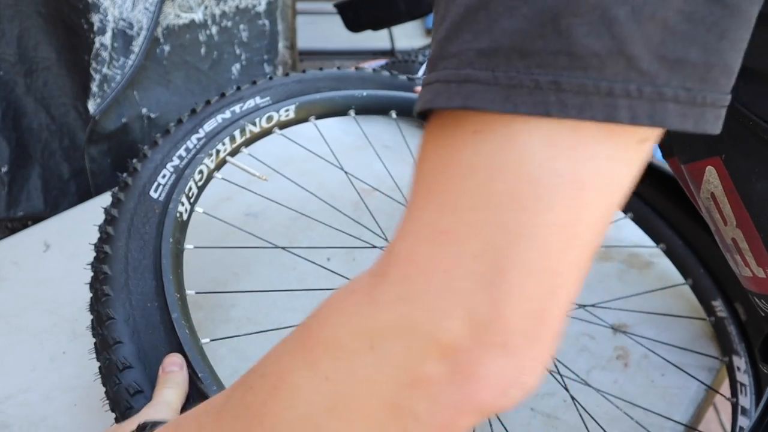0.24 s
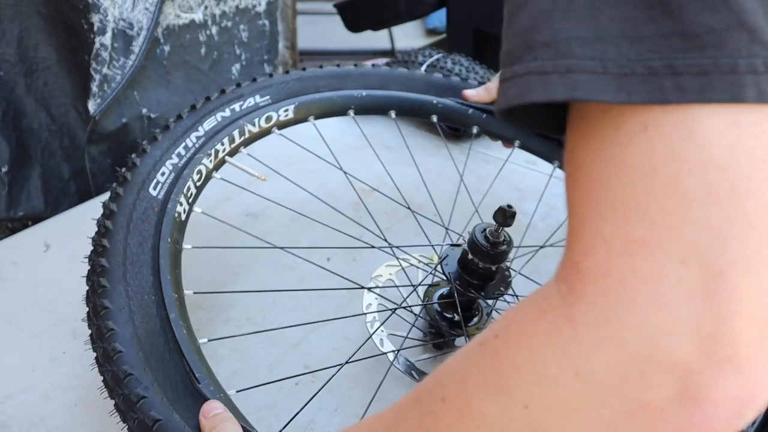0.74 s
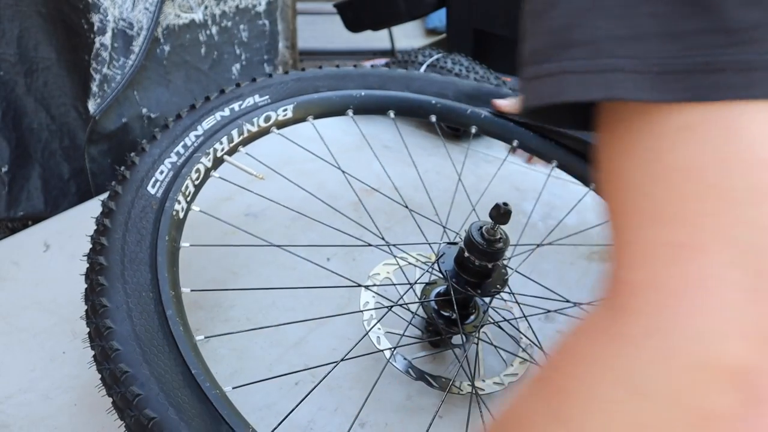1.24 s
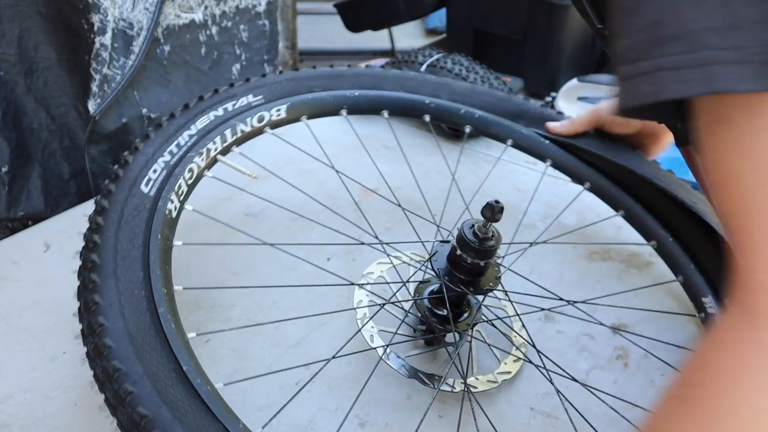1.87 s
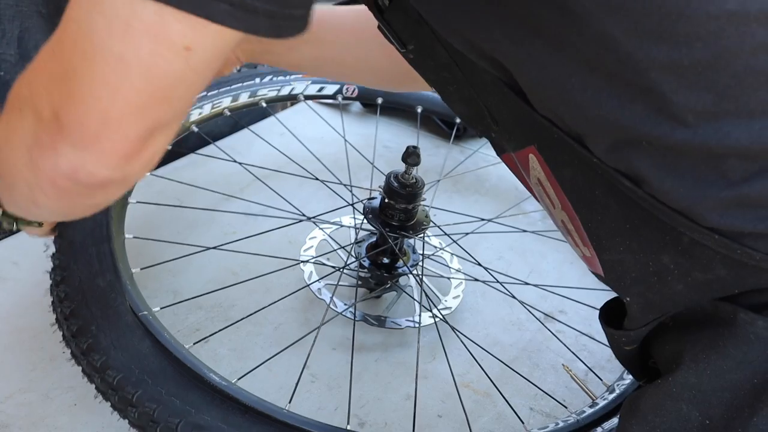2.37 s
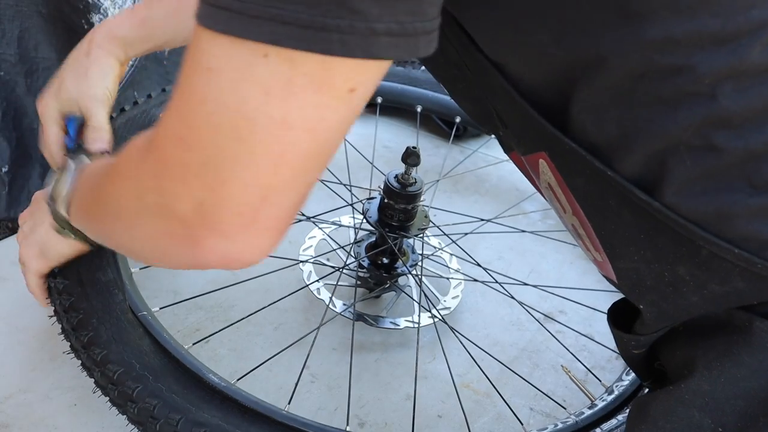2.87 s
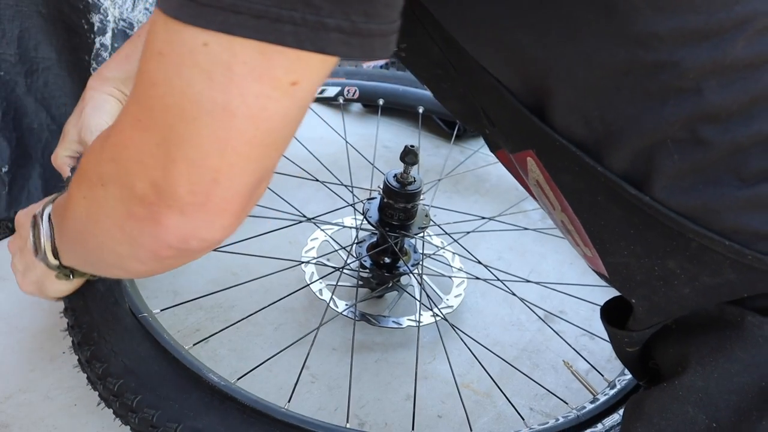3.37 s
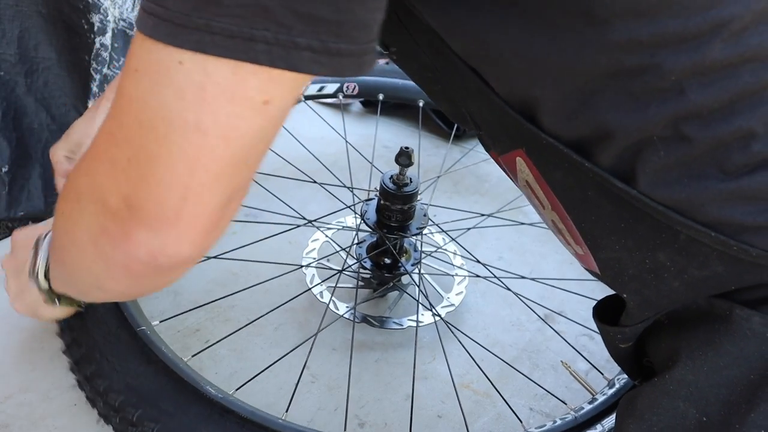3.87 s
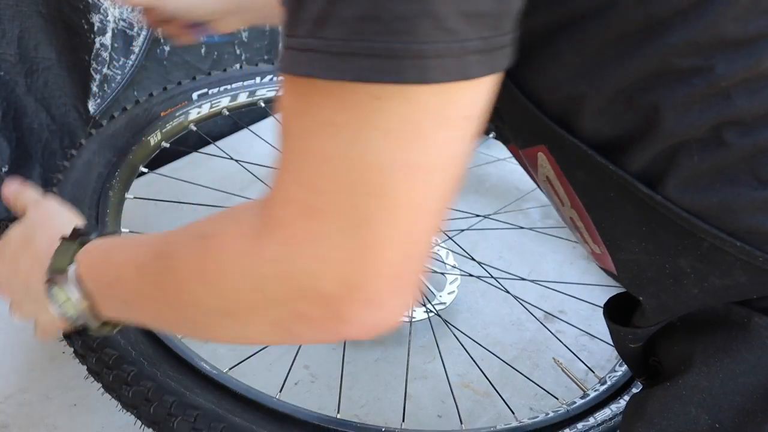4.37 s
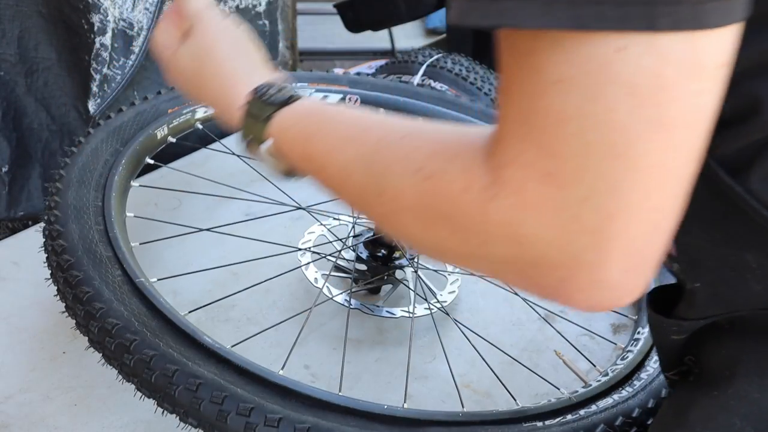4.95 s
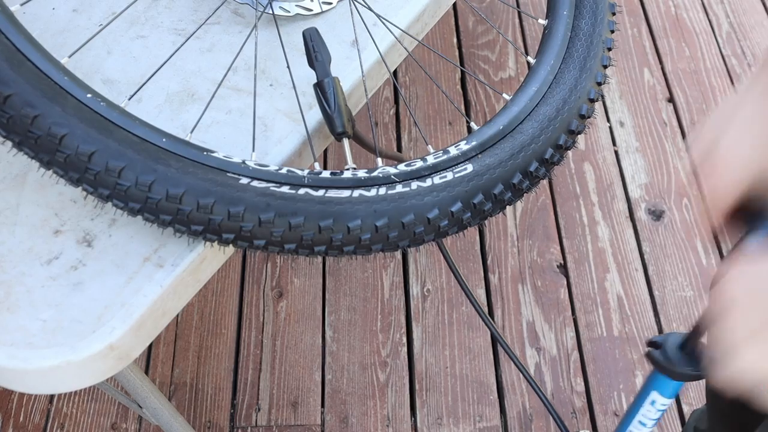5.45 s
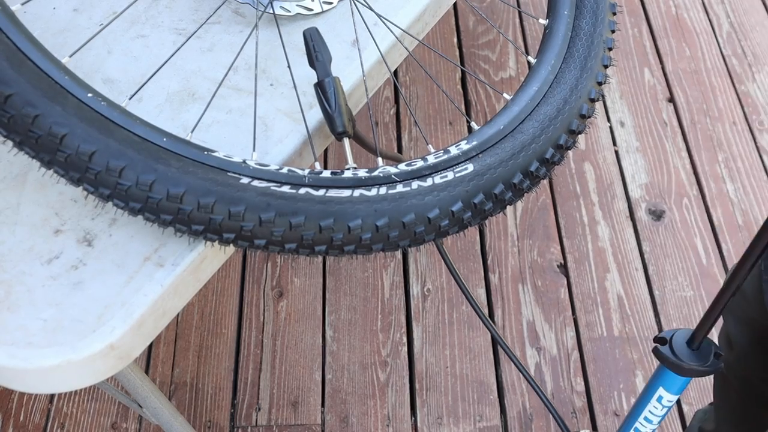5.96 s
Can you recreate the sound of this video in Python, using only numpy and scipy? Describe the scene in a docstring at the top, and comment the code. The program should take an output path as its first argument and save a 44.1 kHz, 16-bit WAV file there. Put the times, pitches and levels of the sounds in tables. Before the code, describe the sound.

Outdoors, a bicycle tyre is worked onto its rim with rubbing, table thumps and sharp rubber snaps, then a hand pump hisses and knocks.

```python
"""On a wooden deck outdoors, a bicycle wheel lies on a plastic table while a tyre is worked onto its rim.
Ringing modes and dense clatter make the thumps on the table top and the snaps of the bead, the tyre's edge.
Shaped noise makes the palms sliding over rubber, the rustling and the ticks; gliding tones make a small bird.
Then a floor pump hisses through one stroke, knocks at the bottom, is drawn up and starts the next.
Behind it all lie steady outdoor noise and a far hum."""
import sys
import numpy as np
from scipy import signal
from scipy.fft import rfft, irfft, next_fast_len
from scipy.io import wavfile
from scipy.ndimage import uniform_filter1d, minimum_filter1d

SR = 44100
rng = np.random.default_rng(int(sys.argv[2]) if len(sys.argv) > 2 else 0)


def generate_wav(sig):
    """Save sig (samples, or channels by samples) to the path in sys.argv[1] as 16-bit PCM at SR."""
    pcm = np.round(np.clip(np.atleast_2d(sig).T, -1, 1) * 32767).astype(np.int16)
    wavfile.write(sys.argv[1], SR, pcm)


N = 274302
TIME = np.arange(N) / SR
AGE = np.arange(int(.45 * SR)) / SR   # seconds since the start of one short sound

# In all tables t60_s is the time a ringing sound takes to fall by 60 dB.
# Outdoor background: pitch_hz, level_db (per Hz)
BACKGROUND = [(15, -61), (25, -29), (43, -13.5), (84, -9), (120, -6.5), (141, -7.5), (285, -9.5),
              (317, -13), (354, -11), (545, -16.5), (734, -18), (2160, -29), (8830, -39), (16000, -43)]
BACKGROUND_DB = -58
HUM_HZ, HUM_DB = 120, -66.5
# Scatter from house wall and furniture: pitch_hz, level_db (per Hz), t60_s
YARD = [(146, 1.5, 0.28), (599.7, 3, 0.17), (2630, -0.5, .15), (6000, 0.5, 0.056), (15300, 0.5, 0.16)]
# Bird notes: start_s, length_s, start_hz, end_hz, level_db
CHIRPS = [(0.053, 0.043, 7130, 7030, -42), (0.578, 0.045, 7230, 6870, -35.5),
          (1.077, 0.05, 7200, 7150, -73), (2.949, 0.07, 6900, 7170, -62)]

# Rustling of clothes and fingers, and at 1.615 s the noisy tail of the first snap:
# peak_s, rise_s, fall_s, level_db, swish_db (bright part, relative to the rustle)
RUSTLE = [(0.03, 0.26, 0.58, -50, -15), (1.0, 0.22, 0.39, -59, -32), (1.615, 0.097, 0.14, -47, -26),
          (2.24, 0.47, 0.35, -59.5, -27), (2.45, 0.18, 0.16, -59, -3.5), (2.9, 0.31, 0.37, -61.5, -25),
          (3.59, 0.054, 0.044, -56, -11), (3.92, 0.32, 0.49, -56.5, -30.5), (5.98, 0.65, 1, -53, -32)]
# Colour of the dull rustle: pitch_hz, level_db (per Hz)
RUSTLE_COLOUR = [(400, 12.5), (2500, -2), (5000, -10), (9000, -11.5), (16000, -24)]
RUSTLE_REST_DB = -67.5   # between the swells
# A palm slides along the tyre: start_s, length_s, level_db, firmness (of the grip, 0 to 1)
SLIDES = [(0.532, 0.31, -49.5, 0.25), (1.206, 0.28, -40.5, 0.09), (1.836, 0.28, -39.5, 0.82)]
# Colour of the rubbing under a light and under a firm grip: pitch_hz, level_db (per Hz)
LIGHT_GRIP = [(350, -46), (600, 12), (698, -4.5), (801, 17.5), (881, 8), (970, 10.5), (1530, 3.5),
              (2540, 0.5), (3530, -10), (5190, 2), (7020, 0.5), (8740, 5), (14900, -27), (16000, -30)]
FIRM_GRIP = [(290, -46), (500, -3.5), (740, 6.5), (1440, 0.5), (1980, 7), (2160, 6), (2430, 6), (3340, 5),
             (4030, 6), (5020, 0), (8580, -4), (16000, -32)]
SLIDE_POWER = 1.7   # the speed is half a sine; the hiss grows as this power of it
# Rubber shuddering as it is pushed over the rim
SHUDDER_S, SHUDDER_LENGTH_S, SHUDDER_HZ, SHUDDER_DB = 2.888, .095, 87.7, -43
# A finger squeaking on the tyre
SQUEAK_S, SQUEAK_LENGTH_S, SQUEAK_HZ, SQUEAK_DB = 4.252, .058, 977, -54.5

# The clearest ticks and scuffs of rubber, rim and pump fittings: start_s, level_db, pitch_hz, t60_s
TICKS = [(0.997, -46.5, 2600, 0.1), (1.019, -44, 5100, 0.0087), (1.2053, -49.5, 5470, 0.02),
         (1.712, -54, 4000, 0.027), (2.2837, -49, 4330, 0.19), (2.374, -54, 3260, 0.097),
         (2.447, -48.5, 2300, 0.16), (3.1627, -50, 3540, 0.02), (3.2842, -49.5, 1793, 0.028),
         (3.702, -49.5, 840, .1), (3.8986, -39, 2000, 0.092), (3.97, -51, 1990, 0.17),
         (4.191, -48.5, 2160, 0.11), (5.403, -37, 2240, 0.081), (5.7022, -34, 2800, 0.033),
         (5.848, -39, 1390, 0.073), (5.877, -46, 2630, 0.26), (6.028, -47, 1200, 0.26)]
# Fainter ticks come at random; their level is relative to the rustle around them
STRAY_WAIT_S = 1 / 6.8   # median wait from one to the next
STRAY_DB, STRAY_SPREAD_DB = 3.5, 1.5
STRAY_HZ, STRAY_SPREAD_OCTAVES, STRAY_T60_S = 3200, 0.5, 0.043

# The pump handle is pushed down: start_s, open_s (time for the valve to open), level_db
STROKES = [(5.437, 0.0088, -47.5), (6.146, 0.03, -46)]
STROKE_S = .272
# The hiss swells as the weight comes on the handle
PUSH_DB, PUSH_PEAK_S, PUSH_RISE_S, PUSH_FALL_S = 5, .21, 0.17, 0.18
SHUT_DB, BLEED_T60_S = -6.5, 0.29   # at the bottom the flow drops and the hose bleeds out
# The handle is drawn up and sucks air in
INTAKE_S, INTAKE_RISE_S, INTAKE_FALL_S, INTAKE_DB = 6.03, 0.15, 0.069, -50.5
# Colour of the pump's hiss: pitch_hz, level_db (per Hz)
AIR_COLOUR = [(200, 5.5), (650, 7.5), (1100, 2), (2300, -6), (3300, -1), (5500, 5), (6700, 3), (8500, 8),
              (10300, -1), (14000, -2.5), (16000, -6)]
# Piston meeting the ends of its travel: start_s, level_db, cutoff_hz
PISTON = [(5.7034, -16, 925), (5.708, 2.5, 840), (6.025, -27, 617)]
# Modes (ringing notes) of the pump barrel: pitch_hz, level_db, t60_s
PUMP_MODES = [(233, -28, 0.25), (345, -19.5, 0.043), (453, -3.5, 0.017), (578, 1, 0.015), (661, -0.5, 0.02),
              (860, -9.5, 0.03), (1270, -6.5, 0.022)]
# Boards shaken by the pump's foot: pitch_hz, level_db (per Hz), t60_s
DECK_CLATTER = [(50, -17, 0.84), (196, -4, 0.36), (403, 3, 0.11), (680, 0, 0.11), (1040, -7, 0.094),
                (1820, 5, 0.085), (4000, -47, .1)]
# The deck sagging under the stroke and springing back: start_s, level_db, pitch_hz, t60_s
DECK_BOOM = [(5.725, -20, 30.2, 0.35), (5.742, -35.5, 58.7, 0.32), (5.874, -32, 48.5, 0.29)]

# Rim knocked lightly: start_s, level_db
KNOCKS = [(0.3143, -29.5), (0.3185, -40), (2.287, -44.5), (2.3045, -34.5), (2.311, -46), (2.325, -47),
          (2.461, -47), (3.8986, -32.5), (3.905, -45)]
# The rim with the tyre on it: pitch_hz, level_db, t60_s
RIM_MODES = [(426.7, -7.5, 0.13), (710, 11, 0.023), (876, -0.5, 0.089), (1374, -8.5, 0.05),
             (2210, 6.5, 0.017), (2410, -17, 0.065), (3750, -19, 0.017)]
# The dense shiver of rim and spokes: pitch_hz, level_db (per Hz), t60_s
SHIVER = [(200, -9.5, 0.069), (452, 1.5, 0.13), (750, -1, 0.12), (1410, 5.5, 0.099), (3500, 4.5, 0.07),
          (5940, -2, 0.13), (9010, -17, 0.099), (14970, -14.5, .06)]
# Wheel dropping on the table: start_s, level_db, low_modes_db (extra weight in the bass), contact_cutoff_hz
THUMPS = [(0.032, -29.5, -7.5, 3830), (0.061, -37.5, 2.5, 666), (0.1453, -24, 3, 2570),
          (0.5786, -29.5, -9, 1910), (0.603, -32, 2.5, 696), (0.6756, -24, 2.5, 2000),
          (0.9466, -42.5, -25, 4160), (1.156, -52, 0.5, 1800), (1.2243, -18.5, -2, 2400),
          (1.7884, -16.5, -3.5, 2750), (1.8411, -21.5, -3.5, 2160)]
# Wheel and table top together: pitch_hz, level_db, t60_s (before the hands choke it)
TABLE_MODES = [(61.8, 0.5, 0.19), (92, -6, 0.59), (157.5, -8, 0.53), (208.8, 2.5, 0.18), (303, -21, 0.099),
               (375, -12, 0.08), (429.3, -1, 0.097), (457, -14.5, 0.51), (543.6, -3, 0.071),
               (783, -9.5, 0.083), (966, -3, 0.057), (1110, -48, 0.43), (1480, -32, 0.022),
               (2123, -11.5, 0.051)]
# Their crowd of weaker modes: pitch_hz, level_db (per Hz), t60_s
TABLE_CLATTER = [(100, 6, 0.051), (406, 1.5, 0.25), (594, -8.5, 0.17), (990, -3, 0.12), (1860, -5.5, 0.083),
                 (3040, -21.5, 0.12), (6450, -18, 0.13), (14000, -42, 0.2)]
# Bead slipping into the rim: start_s, crack_db, crack_hz, overtone_db, crack_cutoff_hz,
# hollow_db, hollow_hz, hollow_t60_s, hollow_rise_s, table_shake_db
SNAPS = [(1.6092, -3.5, 1850, -4, 16000, -1.5, 610, 0.019, 0.00082, -18),
         (3.6044, -59, 900, -20, 3020, -10.5, 381, 0.024, 0.0035, -56.5),
         (3.6965, -45.5, 868, -2, 2670, -32.5, 234, 0.086, 0.0012, -42),
         (3.8260, 0.5, 2650, -34.5, 4700, -10.5, 314, 0.033, 0.00067, -39)]
# The crack of rubber on the rim wall: multiple (of its main note), level_db, t60_s
CRACK = [(.52, -5, 0.0062), (.76, -2.5, .005), (1, 4, .005), (1.3, -5, 0.0066)]
# The pocket of air under the bead: multiple (of its hollow note), level_db
HOLLOW = [(1, 7), (1.12, -12), (1.42, -9.5), (.8, -17)]

# Half-octave bands from 30 Hz up, and a filter for each
BAND_EDGES = 30 * 2 ** np.arange(0, 9.1, .5)
BANDS = [signal.butter(2, pair, "band", fs=SR, output="sos") for pair in zip(BAND_EDGES, BAND_EDGES[1:])]
LIMIT = .97   # loudest peak that passes the limiter unchanged
CUTOFF_HZ = 16000


def from_db(db):
    """Decibels to gain."""
    return np.exp(np.asarray(db) * (np.log(10) / 20))


def rms_one(x):
    """Scale to unit power."""
    return x / np.sqrt(np.mean(x ** 2) + 1e-20)


def at_hz(table, hz, axis=1):
    """Read one column of a table on a log-frequency axis."""
    table = np.array(table)
    return np.interp(np.log(hz + 1e-9), np.log(table[:, 0]), table[:, axis])


def add(track, s, sound):
    """Mix a sound into the track at a moment."""
    start = max(round(s * SR), 0)
    track[start:start + len(sound)] += sound[:N - start]


def fade(t60):
    """Free decay, down to a vanishing remainder."""
    return np.exp(-np.minimum(np.log(1000) * AGE / t60, 40))


def soften(x, hz, order=2):
    """Low-pass: dull the sound above hz."""
    return signal.sosfilt(signal.butter(order, hz, fs=SR, output="sos"), x + 1e-18)


def thin(x, hz, order=2):
    """High-pass: remove the weight below hz."""
    return signal.sosfilt(signal.butter(order, hz, "high", fs=SR, output="sos"), x + 1e-18)


def resonate(x, hz, width_hz):
    """A resonance with unit gain on top."""
    r = np.exp(-np.pi * width_hz / SR)
    feedback = [1, -2 * r * np.cos(2 * np.pi * hz / SR), r * r]
    return signal.lfilter(np.array([1, 0, -1]) * (1 - r * r) / 2, feedback, x + 1e-18)


def noise(colour, grain_db=0, grain_hz=100):
    """Coloured noise of unit power whose level trembles with the grain of a surface."""
    size = next_fast_len(N, real=True)
    shape = from_db(at_hz(colour, np.fft.rfftfreq(size, 1 / SR)))
    smooth = irfft(rfft(rng.standard_normal(size)) * shape, size)[:N]
    grain = rms_one(soften(rng.standard_normal(N), grain_hz))
    return rms_one(smooth * from_db(grain_db * grain))


def ring(hz, t60, swell_cycles):
    """A mode that builds up over a few cycles or less and dies away."""
    swell = 1 - np.exp(-AGE * hz / swell_cycles)
    return np.sin(2 * np.pi * hz * AGE) * fade(t60) * swell


def clatter(table, swell_cycles):
    """Countless close modes as half-octave noise bands; low bands build up more slowly, each has its decay."""
    out, power = 0, 0
    # neighbouring bands get unrelated noise, with a run-in to settle the filters
    white = rng.standard_normal((2, len(AGE) + SR // 10))
    for k, (sos, low, high) in enumerate(zip(BANDS, BAND_EDGES, BAND_EDGES[1:])):
        hz = np.sqrt(low * high)
        band = rms_one(signal.sosfilt(sos, white[k % 2])[-len(AGE):])
        gain = from_db(at_hz(table, hz)) * np.sqrt(high - low)
        swell = 1 - np.exp(-np.minimum(AGE * hz / swell_cycles, 20))
        out = out + gain * band * swell * fade(at_hz(table, hz, axis=2))
        power += gain ** 2
    return out / np.sqrt(power)


def arch_at(s, rise_s, fall_s, roundness=1.3):
    """An arch over time, 1 at moment s and a tenth of that rise_s before and fall_s after."""
    away = np.maximum((s - TIME) / rise_s, (TIME - s) / fall_s)
    return .1 ** np.minimum(away ** roundness, 10)


def outdoors():
    """Steady outdoor noise and a far hum, a single pure tone."""
    background = from_db(BACKGROUND_DB) * noise(BACKGROUND, grain_db=0.6, grain_hz=17)
    hum = from_db(HUM_DB) * np.sqrt(2) * np.sin(2 * np.pi * HUM_HZ * TIME)
    return background + hum


def yard(x, build_s=0.0065):
    """A short diffuse tail from nearby surfaces."""
    tail = clatter(YARD, swell_cycles=1) * (1 - np.exp(-AGE / build_s))
    return signal.fftconvolve(x, tail / np.sqrt(np.sum(tail ** 2)))[:N]


def bird(waver_hz=130, octave_db=-25, echo_db=-6):
    """Thin wavering notes with a faint octave, smeared by their echoes."""
    out = np.zeros(N)
    for s, length, start_hz, end_hz, db in CHIRPS:
        n = int(length * SR)
        waver = waver_hz * rms_one(soften(rng.standard_normal(n), 600))
        pitch = np.linspace(start_hz, end_hz, n) + waver
        phase = 2 * np.pi * np.cumsum(pitch) / SR
        note = np.sin(phase) + from_db(octave_db) * np.sin(2 * phase)
        add(out, s, from_db(db) * np.hanning(n) * note)
    return out + from_db(echo_db) * yard(out)


def rustling():
    """Strength over time of the dull rustle and of the bright swish, the tail of the first snap included."""
    rustle, swish = from_db(RUSTLE_REST_DB), 0
    for s, rise_s, fall_s, db, swish_db in RUSTLE:
        strength = from_db(db) * arch_at(s, rise_s, fall_s)
        rustle = rustle + strength
        swish = swish + from_db(swish_db) * strength
    return rustle, swish


def hands(rustle, swish, sheen_db=-19, sheen_hz=12500, sheen_power=3.2, swish_hz=8000):
    """Skin hisses over the tread, brightest at full speed; rustling noise swells, and once rubber shudders."""
    light = noise(LIGHT_GRIP, grain_db=1.8, grain_hz=250)
    firm = noise(FIRM_GRIP, grain_db=2.0, grain_hz=250)
    sheen = rms_one(thin(rng.standard_normal(N), sheen_hz, order=4))
    out = np.zeros(N)
    for s, length, db, firmness in SLIDES:
        speed = np.abs(np.sin(np.pi * np.clip((TIME - s) / length, 0, 1)))
        rub = np.sqrt(1 - firmness) * light + np.sqrt(firmness) * firm
        bright = from_db(sheen_db) * speed ** sheen_power * sheen
        out += from_db(db) * (speed ** SLIDE_POWER * rub + bright)
    out += rustle * noise(RUSTLE_COLOUR, grain_db=2.2, grain_hz=90)
    out += swish * rms_one(thin(rng.standard_normal(N), swish_hz))
    arch = signal.windows.tukey(int(SHUDDER_LENGTH_S * SR), .5)
    shudder = arch * np.sin(2 * np.pi * SHUDDER_HZ * AGE[:len(arch)])
    add(out, SHUDDER_S, from_db(SHUDDER_DB) * shudder)
    return out


def squeak():
    """A finger squeaks on the rubber: noise through two narrow resonances makes one short thin note."""
    arch = np.hanning(int(SQUEAK_LENGTH_S * SR))
    once = resonate(rng.standard_normal(len(AGE)), SQUEAK_HZ, 90)
    note = rms_one(resonate(once, SQUEAK_HZ, 90)[-len(arch):])
    out = np.zeros(N)
    add(out, SQUEAK_S, from_db(SQUEAK_DB) * arch * note)
    return out


def stray_ticks(rustle):
    """Rows of faint random ticks whose level follows the rustle around them."""
    rows, s = [], 0
    for wait, size, pitch in rng.standard_normal((60, 3)):
        s += np.exp(wait / 2) * STRAY_WAIT_S
        if s < TIME[-1]:
            db = 20 * np.log10(rustle[int(s * SR)]) + STRAY_DB + STRAY_SPREAD_DB * size
            hz = STRAY_HZ * 2 ** (STRAY_SPREAD_OCTAVES * pitch)
            rows.append((s, db, hz, STRAY_T60_S))
    return rows


def ticks(rustle, grain_db=3.5):
    """Each tick is a short gritty slip with one broad resonance and little above it."""
    out = np.zeros(N)
    for s, db, hz, t60 in TICKS + stray_ticks(rustle):
        grain = rms_one(soften(rng.standard_normal(len(AGE)), 600))
        grit = rng.standard_normal(len(AGE)) * from_db(grain_db * grain)
        # rubber damps it: the resonance is as wide as it is high
        slip = soften(resonate(grit, hz, width_hz=hz), hz)
        add(out, s, from_db(db) * rms_one(slip) * fade(t60))
    return out


def airflow():
    """The valve opens, the hiss swells with the push and dies at the bottom; the intake is a softer arch."""
    flow = from_db(INTAKE_DB) * arch_at(INTAKE_S, INTAKE_RISE_S, INTAKE_FALL_S)
    for s, open_s, db in STROKES:
        age = np.maximum(TIME - s, 0)
        opening = (1 - np.exp(-age / open_s)) ** 2
        push_db = PUSH_DB * arch_at(s + PUSH_PEAK_S, PUSH_RISE_S, PUSH_FALL_S)
        shut_db = (age > STROKE_S) * (SHUT_DB - 60 * (age - STROKE_S) / BLEED_T60_S)
        flow = flow + opening * from_db(db + push_db + shut_db)
    return flow


def barrel_echo(hiss, long_s=0.000605, short_s=.00033, echo_db=-9):
    """The hiss rebounds from the piston; the air column shortens on each stroke, so its colour rises."""
    travel = np.zeros(N)
    for s, _, _ in STROKES:
        travel = np.where(TIME >= s, np.clip((TIME - s) / STROKE_S, 0, 1), travel)
    delay = long_s + (short_s - long_s) * travel
    return rms_one(hiss + from_db(echo_db) * np.interp(TIME - delay, TIME, hiss))


def pump(deck_db=-18):
    """Air hisses through the valve; the piston's rubber stop knocks on the barrel and shakes the deck."""
    out = airflow() * barrel_echo(noise(AIR_COLOUR))
    for s, db, stop_hz in PISTON:
        barrel = sum(from_db(share_db) * ring(hz, t60, swell_cycles=0.52) for hz, share_db, t60 in PUMP_MODES)
        boards = from_db(deck_db) * clatter(DECK_CLATTER, swell_cycles=0.82)
        knock = thin(barrel, 250, order=1) + boards
        add(out, s, from_db(db) * soften(knock, stop_hz, order=4))
    for s, db, hz, t60 in DECK_BOOM:
        add(out, s, from_db(db) * ring(hz, t60, swell_cycles=1.24))
    return out


def rim(shiver_db=-6, scatter_db=2):
    """Light knocks ring the rim's modes, each time with other strengths."""
    out = np.zeros(N)
    for s, db in KNOCKS:
        modes = 0
        for hz, share_db, t60 in RIM_MODES:
            strength_db = share_db + scatter_db * rng.standard_normal()
            modes = modes + from_db(strength_db) * ring(hz, t60, swell_cycles=1.0)
        shiver = from_db(shiver_db) * soften(clatter(SHIVER, swell_cycles=0.3), 2060)
        add(out, s, from_db(db) * (modes + shiver))
    return out


def wheel(clatter_db=-1, mode_db=-1, scatter_db=2, low_hz=260, bass_edge_hz=55, hold_s=0.092, left_db=-20):
    """The tyre lands on the table; a heavier, flatter landing stirs more of the low modes."""
    out = np.zeros(N)
    # the hands soon choke the ringing, all but a small rest
    gripped = np.exp(-(AGE / hold_s) ** 4)
    choke = from_db(left_db) + 1.41 * gripped
    for s, db, weight_db, contact_hz in THUMPS:
        body = 0
        for k, (hz, share_db, t60) in enumerate(TABLE_MODES):
            bass_db = weight_db / (1 + (hz / low_hz) ** 4)
            strength_db = share_db + bass_db + scatter_db * rng.standard_normal()
            # bending waves cross the table top slowly in the bass, so low modes build up late
            late = 1 - np.exp(-(AGE * hz) ** 2)
            mode = ring(hz * (1 + 0.019 * rng.standard_normal()), t60, swell_cycles=1.0)
            body = body + (-1) ** k * from_db(strength_db) * late * mode
        crowd = clatter(TABLE_CLATTER, swell_cycles=0.45)
        blow = from_db(mode_db) * body + from_db(clatter_db) * crowd
        add(out, s, from_db(db) * soften(blow * choke, contact_hz))
    return thin(out, bass_edge_hz, order=4)


def crack_sound(crack_hz, overtone_db, overtone_ratio=3.15, overtone_t60=0.0047, splinter_db=-8,
                splinter_t60=0.0075, shiver_db=-23, edge_db=-19, edge_hz=13000, edge_t60=.008):
    """Rubber slaps the rim wall: very short notes and noise bursts, then the shiver of the spokes."""
    crack = 0
    for k, (multiple, db, t60) in enumerate(CRACK):
        crack = crack + (-1) ** k * from_db(db) * ring(multiple * crack_hz, t60, swell_cycles=0.26)
    crack += from_db(overtone_db) * ring(overtone_ratio * crack_hz, overtone_t60, swell_cycles=0.65)
    splinter = rms_one(resonate(rng.standard_normal(len(AGE)), 2200, 7000))
    crack += from_db(splinter_db) * splinter * fade(splinter_t60)
    hard_edge = rms_one(thin(rng.standard_normal(len(AGE)), edge_hz, order=4))
    crack += from_db(edge_db) * hard_edge * fade(edge_t60)
    return thin(crack, 900) + from_db(shiver_db) * clatter(SHIVER, swell_cycles=0.25)


def bead(lag_s=0.00084):
    """The bead cracks on the rim, spokes and table shiver and the pocket of air under it rings hollow."""
    out = np.zeros(N)
    for (s, crack_db, crack_hz, overtone_db, top_hz,
         hollow_db, hollow_hz, hollow_t60, rise_s, table_db) in SNAPS:
        add(out, s, from_db(crack_db) * soften(crack_sound(crack_hz, overtone_db), top_hz))
        pocket = 0
        for multiple, db in HOLLOW:
            pocket = pocket + from_db(db) * ring(multiple * hollow_hz, hollow_t60, swell_cycles=0.081)
        pocket *= (1 - np.exp(-AGE / rise_s)) ** 2
        # the hollow note carries little below its own pitch
        add(out, s + lag_s, from_db(hollow_db) * thin(pocket, 0.89 * hollow_hz, order=3))
        shake = thin(soften(clatter(TABLE_CLATTER, swell_cycles=0.71), 1100), 110) * fade(0.9)
        add(out, s, from_db(table_db) * shake)
    return out


def scene(snap_wet_db=-20, wet_db=-15):
    """All sources and their echoes over the outdoor background and a far hum."""
    rustle, swish = rustling()
    work = hands(rustle, swish) + squeak() + ticks(rustle) + pump() + rim() + wheel()
    snaps = bead()
    echoes = yard(from_db(snap_wet_db) * snaps + from_db(wet_db) * work)
    return (outdoors() + bird() + work + snaps + echoes)[None]


def record(dry):
    """A look-ahead limiter ducks the loudest peaks; the top is cut."""
    allowed = LIMIT / np.maximum(np.abs(dry), LIMIT)
    gain = uniform_filter1d(minimum_filter1d(allowed, size=129), size=129)
    top_cut = signal.ellip(10, .1, 80, CUTOFF_HZ, fs=SR, output="sos")
    return signal.sosfilt(top_cut, dry * gain)


dry = scene()
out = record(dry)
generate_wav(out)
```